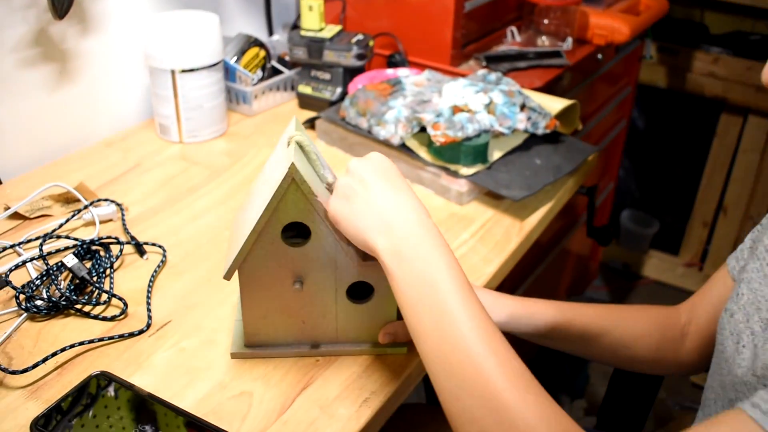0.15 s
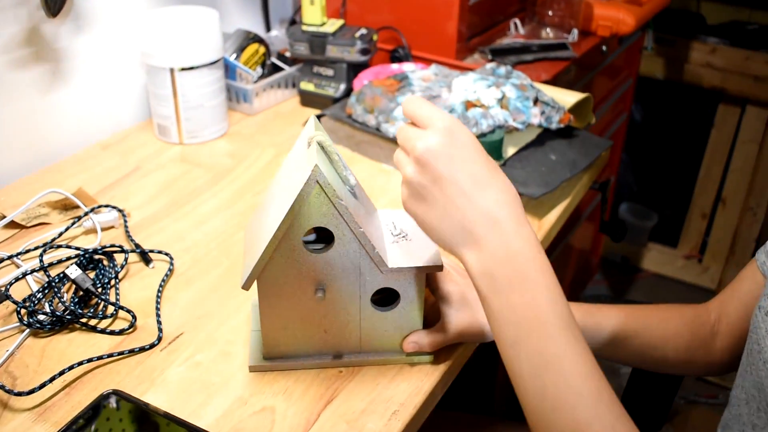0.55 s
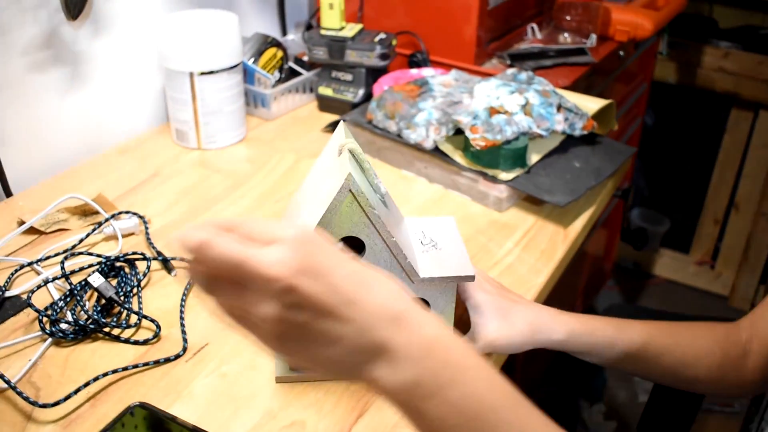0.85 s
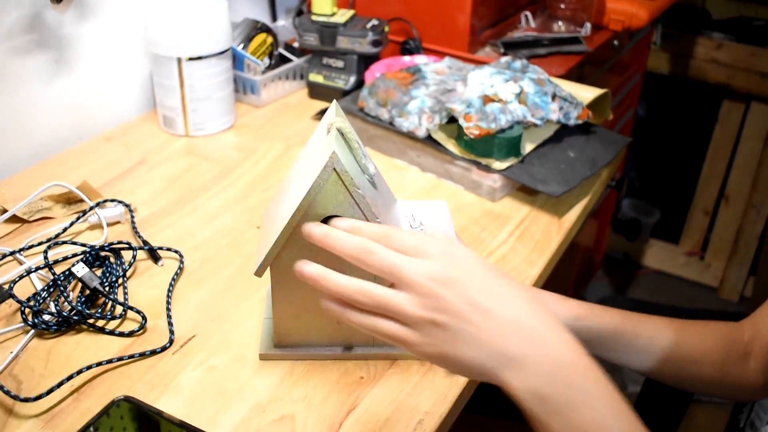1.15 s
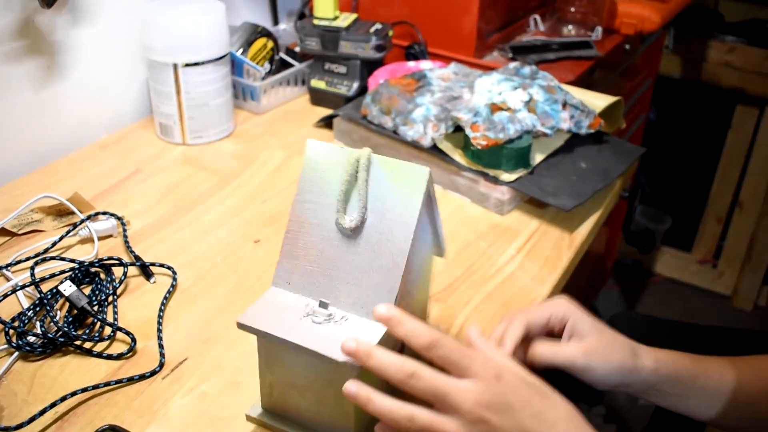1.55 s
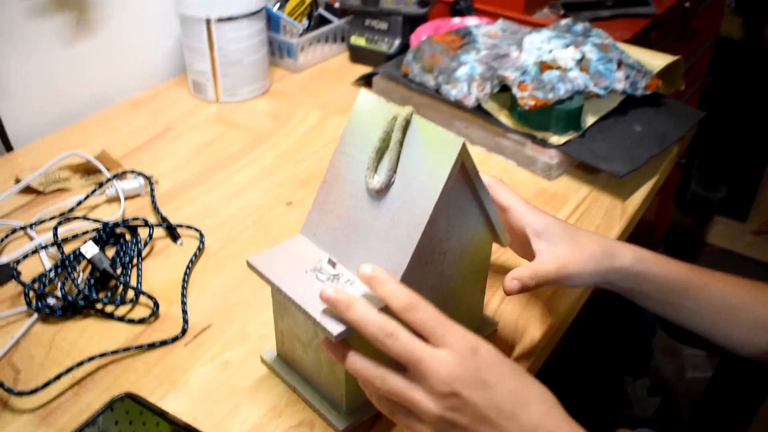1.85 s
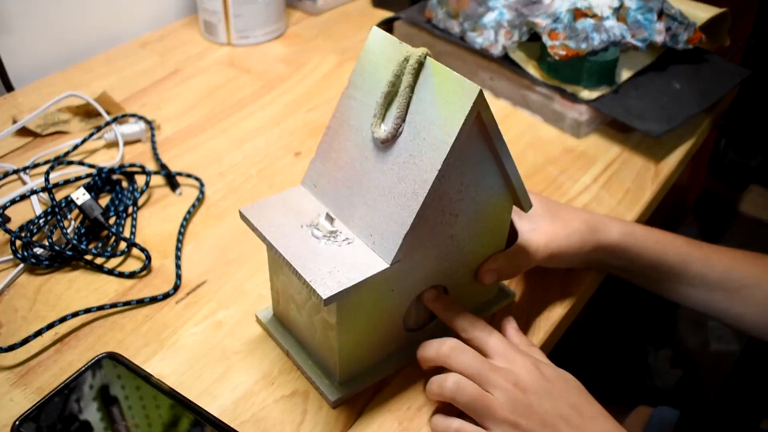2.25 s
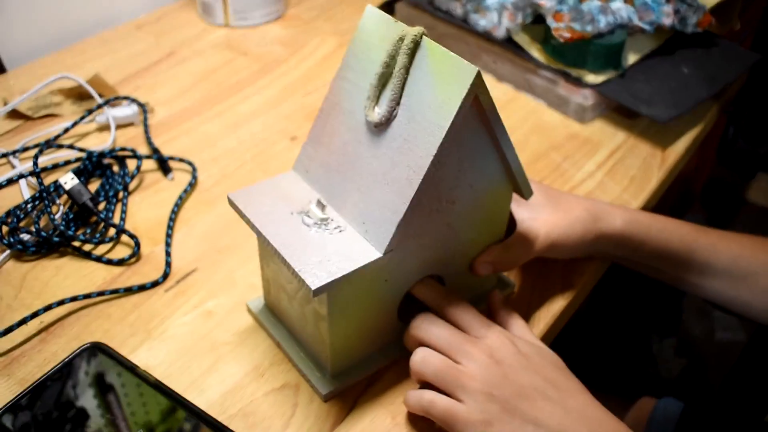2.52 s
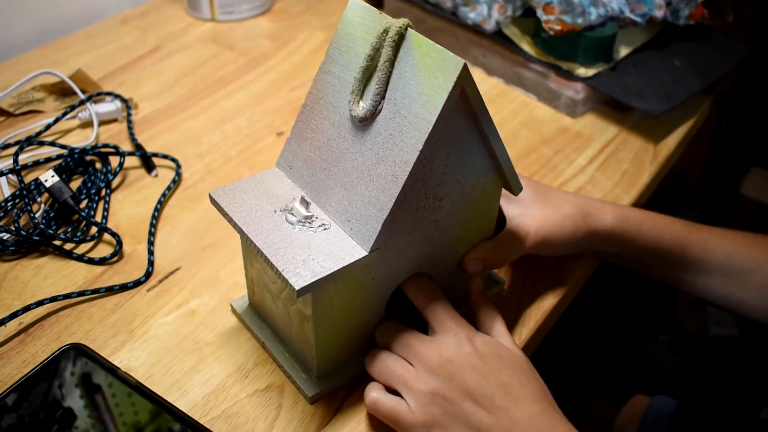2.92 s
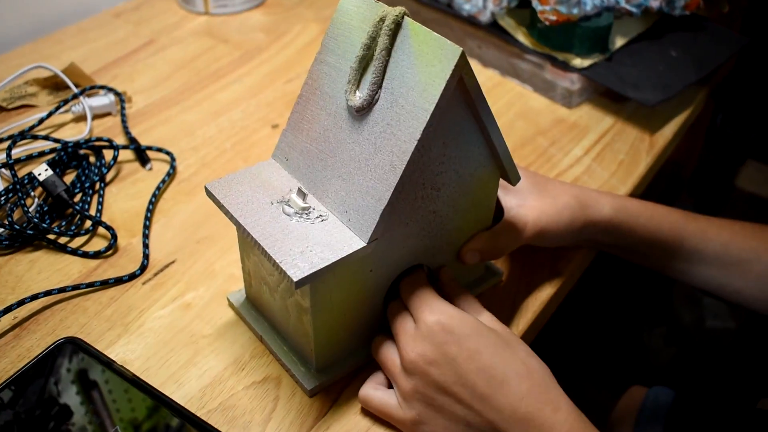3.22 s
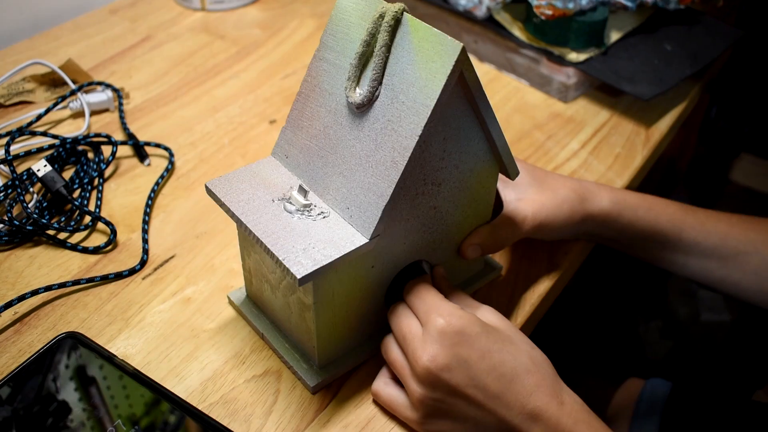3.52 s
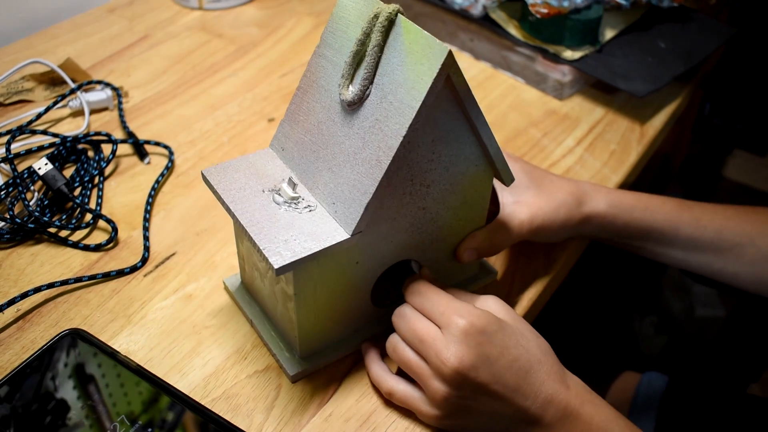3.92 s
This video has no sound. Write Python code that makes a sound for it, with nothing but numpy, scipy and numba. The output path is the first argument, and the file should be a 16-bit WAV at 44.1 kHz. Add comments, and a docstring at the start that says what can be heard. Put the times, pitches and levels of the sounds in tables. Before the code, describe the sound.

Tape rasps off a hollow wooden box, which judders across a bench with a scraping rattle, then fingers rub and tick at its hole.

```python
"""In a small workshop, hands peel masking tape off a hollow wooden box, turn it on a bench and pick at its entrance hole.
Stick-slip grains and single clicks ring the walls, base, cavity and roof of the box, the bench top and the tape paper.
The dragged box judders: its landings boom in the bench, grit crunches and a base edge scrapes in a narrow band.
A lifted strip of tape rings at a moving pitch; the room answers with a short tail over quiet, low air."""
import sys
import numpy as np
from scipy import signal
from scipy.fft import rfft, irfft
from scipy.io import wavfile
from scipy.ndimage import uniform_filter1d
from numba import njit

SR = 44100
rng = np.random.default_rng(int(sys.argv[2]) if len(sys.argv) > 2 else 0)


def output_pcm(signal):
    """Save a mono or channel-first signal as 16-bit PCM at the path in sys.argv[1].

    Samples are clipped to [-1, 1] before scaling.
    """
    pcm = np.clip(np.atleast_2d(signal).T, -1, 1) * 32767
    wavfile.write(sys.argv[1], SR, np.round(pcm).astype(np.int16))


N = 179619


def undb(db):
    """Amplitude factor of a level in dB."""
    return 10 ** (np.asarray(db) / 20)


def unit(x):
    """Scale to rms 1."""
    return x / np.sqrt(np.mean(x ** 2))


def colour(x, points):
    """Filter by a spectrum of (frequency [Hz], level [dB])."""
    hz, db = np.transpose(points)
    f = np.fft.rfftfreq(len(x), 1 / SR)
    gain = undb(np.interp(np.log(f + 1), np.log(hz), db))
    return irfft(rfft(x) * gain, len(x))


def walk(rate):
    """Random levels, rate per second, joined by slopes; rms 1."""
    k = int(SR / rate)
    steps = np.repeat(rng.standard_normal(N // k + 1), k)
    return unit(uniform_filter1d(steps, k)[:N])


def curves(table):
    """Columns of a time table, one value per sample."""
    s, *columns = np.transpose(table)
    return [np.interp(np.arange(N) / SR, s, c) for c in columns]


def strike(out, s, ring, peak_db):
    """Add a ring at time s with the given peak."""
    i = int(s * SR)
    out[i:i + len(ring)] += ring * undb(peak_db) / np.abs(ring).max()


def body(modes, sign=-1, below=0.7):
    """Impulse response of damped modes, alternating in sign or in step, weak outside their range; energy 1."""
    t = np.arange(SR // 10) / SR
    ring = np.zeros(len(t))
    for k, (hz, width_hz, db) in enumerate(modes):
        fade = np.exp(-np.pi * width_hz * t)
        ring += sign ** k * undb(db) * width_hz * fade * np.sin(2 * np.pi * hz * t)
    edges = [below * modes[0][0], 1.3 * modes[-1][0]]
    ring = signal.sosfilt(signal.butter(3, edges, "band", fs=SR, output="sos"), ring)
    return ring / np.sqrt(np.sum(ring ** 2))


# resonances of the box, bench top and tape paper: (frequency [Hz], width [Hz], relative level [dB])
WALL_MODES = [(853, 180, 0), (1084, 59, 7.5), (1232, 83, 4.5), (1500, 220, -1), (1699, 36, 3.5)]
BENCH_MODES = [(134.3, 15, 0), (169, 20.6, -4.5)]
BASE_MODES = [(229.2, 60.5, 1), (311, 235, -2)]
CAVITY_MODES = [(369,50,-12.5),(444,46,1.5),(501,29.5,1),(544.3,34,-2),(617,19,-2),(668.5,61,-6),(828,170,-12)]
ROOF_MODES = [(1863, 266, -2), (2128, 115, 1), (2410, 177, -4), (2556, 68, 1), (2732, 400, -4),
              (3226, 330, -4.5), (3660, 230, -3.5), (3870, 360, -6.5), (4637, 960, -8)]
PAPER_MODES = [(4720, 1100, 2), (6020, 2640, 1), (7410, 4630, -3), (11300, 4600, -10.5), (12950, 1600, -13)]


def rubbed_bodies():
    """Responses of walls, bench, base, cavity, roof and paper to friction, modes alternating in sign."""
    return [body(WALL_MODES), body(BENCH_MODES), body(BASE_MODES),
            body(CAVITY_MODES, below=0.9), body(ROOF_MODES), body(PAPER_MODES)]


def struck_bodies(rubbed):
    """A blow starts the modes of walls, cavity and roof together; bench, base and paper stay as rubbed."""
    _, bench, base, _, _, paper = rubbed
    return [body(WALL_MODES, sign=1), bench, base,
            body(CAVITY_MODES, sign=1, below=1.05), body(ROOF_MODES, sign=1), paper]


def slips(rate, scatter_db, hiss):
    """Adhesive and wood let go in random jerks, rate per second, of uneven size over finer friction."""
    when, size, sign = rng.random(N), rng.exponential(size=N), rng.choice([-1, 1], N)
    jerks = (when < rate / SR) * sign * undb(scatter_db * np.minimum(size, 3))
    return unit(unit(jerks) + hiss * rng.standard_normal(N))


def shared(db, shares, low_db, cavity_db, high_db):
    """Power in each of the six bodies: common level, fixed share and the colour of the moment."""
    extra = (0, low_db, low_db, cavity_db, high_db, high_db)
    return np.array([undb(db + a + b) ** 2 for a, b in zip(shares, extra)])


def strokes(table, shares):
    """Power of strokes that each swell, hold and fade along straight lines in dB."""
    t, power = np.arange(N) / SR, 0
    for s, swell, hold, fade, db, *colour_db in table:
        # swells and fades set shorter than 5 ms play as 5 ms
        away = np.maximum((s - t) / max(swell, .005), (t - s - hold) / max(fade, .005))
        power = power + shared(db - 20 * np.maximum(away, 0), shares, *colour_db)
    return power


# tape comes off the wall: (start of hold [s], swell over 20 dB [s], hold [s], fade over 20 dB [s], level [dB],
# bench and base above share [dB], cavity above share [dB], roof and paper above share [dB])
PEEL_STROKES = [(.32, 0.22, 0.24, 0.05, -53.5, 5.5, 3, 1), (.7, 0.14, 0.049, .05, -46.5, -4, -6, -6.5),
                (.775, 0.032, 0.012, 0.016, -37, -3.5, -9, -7.5), (.87, 0.12, 0.14, 0.07, -49, -1, 2.5, -2),
                (1.11, 0.016, 0.046, 0.034, -54, -1, -12, 6)]
# shares of a peel: (walls [dB], bench [dB], base [dB], cavity [dB], roof [dB], paper [dB])
PEEL_BODY_SHARES = (-1, -37, -14.5, -6, -2.5, -13)


def peels():
    """Power that tape tearing off the wall puts into each body."""
    return strokes(PEEL_STROKES, PEEL_BODY_SHARES)


# a finger rubs the hole: (start of hold [s], swell over 20 dB [s], hold [s], fade over 20 dB [s], level [dB],
# bench and base above share [dB], cavity above share [dB], roof and paper above share [dB])
PICK_STROKES = [(2.68, 0.068, 0.14, 0.058, -40, 3.5, -1.5, 3.5),
                (2.9, 0.064, 0.031, 0.035, -42.5, 6, -13.5, 6),
                (2.965, 0.034, 0.05, 0.04, -47.5, 4.5, -3.5, 9.5),
                (3.092, 0.05, 0.019, 0.016, -50.5, 5, 0.5, 4),
                (3.24, 0.044, 0.0088, 0.28, -52, 23.5, -1, -1),
                (3.368, 0.047, 0.022, 0.091, -40, -8.5, 2, -2), (3.4, 0.057, 0.013, 0.032, -30, -18, -6, 7)]
# shares of a pick: (walls [dB], bench [dB], base [dB], cavity [dB], roof [dB], paper [dB])
PICK_BODY_SHARES = (-9.5, -31, -55, 2, -15.5, -31.5)


def picks():
    """Power that a finger rubbing the entrance hole puts into each body."""
    return strokes(PICK_STROKES, PICK_BODY_SHARES)


# the box slides on the bench: (start of hold [s], swell over 20 dB [s], hold [s], fade over 20 dB [s], level [dB],
# bench and base above share [dB], cavity above share [dB], roof and paper above share [dB])
DRAG_STROKES = [(0, 1.2, 0.028, -0.45, -50, 6.5, 2, -7), (.25, -0.7, 0.03, 0, -49, -3, -23, -2.5),
                (.885, 0.2, 0.013, -3, -54, -5, -5, -20), (.93, 0.1, 0.025, .05, -40, -4.5, -6, -8),
                (.965, .04, 0.024, -0.24, -41.5, 1, -7, 0), (1.003, 0, 0.0067, -0.15, -43, 3, -1, -5),
                (1.85, 0.09, 0.0052, 0.05, -44, 0, 1.5, -5),
                (1.303, -0.01, 0.0051, 0.1, -39.5, -10, -13, -0.5),
                (2.076, 0, 0.0063, 0.01, -48.5, -9, -4, -1), (2.15, .05, 0.018, 0.08, -51, -1, 0.5, -3),
                (2.351, .006, 0.0058, -0.05, -46, 1, 1.5, -7),
                (2.379, 0.04, 0.0073, -0.12, -47.5, -6, 5, -8.5), (2.53, 0.05, 0.006, 0, -50, -15, -2, -10),
                (2.597, 0.1, .008, -0.1, -52, -14, -12, -11), (2.36, 0, 0.0099, 0.4, -55, -11, 2, -8.5),
                (3.72, 0.76, 0.022, 0.1, -55, -1, 2, -3), (3.93, 0.37, 0.067, -1.6, -54.5, -7, -0.5, -4)]
# shares of a drag: (walls [dB], bench [dB], base [dB], cavity [dB], roof [dB], paper [dB])
DRAG_BODY_SHARES = (-2.5, -7, -3.5, -0.5, -1, -15)


def drags():
    """Power that short slides of the box on the bench put into each body."""
    return strokes(DRAG_STROKES, DRAG_BODY_SHARES)


# the box turns on the bench in one long drag: (time [s], level [dB], bench and base above share [dB],
# cavity above share [dB], roof and paper above share [dB])
TURN_CURVE = [(1.19, -54, -11, -8, -2), (1.235, -40, 0.5, -10, -4), (1.3, -39, -3.5, -6, -2),
              (1.38, -39, -6.5, -25, -3), (1.43, -39, -2.5, 3.5, 6), (1.49, -39, 6, 6, 2),
              (1.54, -37.5, 2.5, 8, 5.5), (1.58, -40, 6.5, 1.5, 0), (1.62, -42, -7, -3, 2.5),
              (1.72, -49, 0.5, 5, -2.5), (1.78, -78, 1, -5, 8)]


def turn():
    """Power that the long drag puts into each body, silent outside its times."""
    db, *colour_db = curves(TURN_CURVE)
    t = np.arange(N) / SR
    inside = (t > TURN_CURVE[0][0]) * (t < TURN_CURVE[-1][0])
    return shared(db, DRAG_BODY_SHARES, *colour_db) * inside


# hands shift on the box throughout: (time [s], level [dB], bench and base above share [dB],
# cavity above share [dB], roof and paper above share [dB])
HOLD_CURVE = [(0,-48,7,4,0.5),(.32,-62,-7,3,2),(.89,-52.5,-0.5,0,3.5),(1.06,-54,6,3,2.5),(1.27,-49,-2,2,-1),(1.4,-40.5,-4,-1.5,6),(1.51,-49,0,2,2),
              (1.68,-56,7,-7,2),(2.02,-61.5,4,0,3.5),(2.66,-62,5.5,-2,1.5),(2.86,-57,0,10.5,-6),(3.04,-56,-0.5,1,0.5),(3.24,-54.5,-9,-3,1.5),(3.66,-58,0,-11,1.5),
              (3.79,-57,-3.5,-7,-1.5),(4.07,-60.5,1,0,4.5)]
# shares of the holding hands: (walls [dB], bench [dB], base [dB], cavity [dB], roof [dB], paper [dB])
HOLD_BODY_SHARES = (-5.5, -12.5, -8, -6.5, -6.5, -14.5)


def holding():
    """Power that the holding hands put into each body without pause."""
    db, *colour_db = curves(HOLD_CURVE)
    return shared(db, HOLD_BODY_SHARES, *colour_db)


# the dragged box hops: (time of landing [s], depth of the pulsing [0-1], bench boom [dB],
# crunch level [dB, its rms is 6 dB lower], crunch pitch [Hz])
HOP_LANDINGS = [(1.375,0.2,-56,-42,3230),(1.393,0.15,-53,-43,3200),(1.41,0,-38.5,-41,3100),(1.433,0.3,-37,-41,3100),(1.458,0.2,-32.5,-38,2050),
                (1.48,0.17,-32.5,-36,3760),(1.501,0.3,-29,-36,1820),(1.524,0.27,-33.5,-40,2740),(1.546,0.3,-33.5,-36.5,1960),(1.566,0.5,-35,-43.5,3330),
                (1.585,0.4,-35.5,-38,1980),(1.606,0,-48,-46,2680),(1.63,0.2,-67,-44.5,3330)]
CRUNCH_S, CRUNCH_CYCLES = .0022, 9.0  # peak of a grit burst; cycles in which its ring fades by 20 dB


def hop_phase():
    """Count of hops so far, rising by one from each landing to the next."""
    return np.interp(np.arange(N) / SR, np.transpose(HOP_LANDINGS)[0], np.arange(len(HOP_LANDINGS)))


def judder():
    """Pulsing of the friction, one swell per hop; returns its depth and its gain."""
    phase = hop_phase()
    inside = (phase > 0) * (phase < len(HOP_LANDINGS) - 1)
    depth = np.clip(curves(HOP_LANDINGS)[0], 0, 1) * inside
    pulse = 2.2 * np.sin(np.pi * (phase % 1) ** .42) ** 4
    return depth, 1 - depth + depth * pulse


def landings():
    """Every landing after the first row is an impulse that booms in the bench top."""
    boom_db = curves(HOP_LANDINGS)[1]
    mean_gap_s = np.diff(np.transpose(HOP_LANDINGS)[0]).mean()
    impulses = np.diff(np.floor(hop_phase()), prepend=0) * np.sqrt(SR * mean_gap_s)
    return signal.fftconvolve(impulses * undb(boom_db), body(BENCH_MODES, below=0.79))[:N]


def crunches():
    """At each row a burst of grit rings the base edge at its own pitch."""
    out, t = np.zeros(N), np.arange(SR // 25) / SR
    grit = rng.standard_normal((len(HOP_LANDINGS), len(t))) ** 3 * t * np.exp(-t / CRUNCH_S)
    for (s, _, _, db, hz), burst in zip(HOP_LANDINGS, grit):
        edge = np.sin(2 * np.pi * hz * t) * 10 ** (-t * hz / CRUNCH_CYCLES)
        ring = signal.fftconvolve(burst, edge)
        i = int(s * SR)
        out[i:i + len(ring)] += undb(db) * unit(ring) / 2
    return out


# edge of the entrance hole: (frequency [Hz], width [Hz], relative level [dB])
RIM_MODES = [(706, 71, -6), (834, 57, -1.5), (952, 66, -1)]
# dry skin hissing on the rim: (frequency [Hz], width [Hz], relative level [dB])
SKIN_MODES = [(8500, 5700, 1), (13400, 2700, 0)]
RIM_DB, SKIN_DB = -9, -7.5  # rim relative to the cavity drive, skin relative to the paper drive
PAPER_FLICKER_DB = 2  # rms


def rubbing(bodies):
    """Hands play slips into each body; hops pulse walls, cavity, roof and paper, and picks add rim and skin."""
    depth, hop = judder()
    grip = undb(1.5 * walk(45))  # finger pressure trembles
    coarse = slips(rate=400, scatter_db=2.5, hiss=0.72)
    fine = slips(rate=1200, scatter_db=0.0, hiss=0.98)
    medium = unit(coarse + fine)
    flicker = undb(PAPER_FLICKER_DB * walk(25.68))
    drives = (medium * grip * hop,  # walls
              coarse * (1 - depth),  # bench
              coarse,  # base
              coarse * grip * hop,  # cavity
              fine * grip ** (1 - depth) * hop,  # roof
              fine * hop * flicker)  # paper
    pick_power = picks()
    gains = np.sqrt(drags() + peels() + pick_power + turn() + holding())
    out = sum(signal.fftconvolve(d * g, b)[:N] for d, g, b in zip(drives, gains, bodies))
    rim_drive = coarse * grip * np.sqrt(pick_power[3]) * undb(RIM_DB)
    skin_drive = fine * np.sqrt(pick_power[5]) * undb(SKIN_DB)
    out += signal.fftconvolve(rim_drive, body(RIM_MODES))[:N]
    return out + signal.fftconvolve(skin_drive, body(SKIN_MODES))[:N]


# single clicks: (time [s], walls peak [dB], cavity above walls [dB], roof above walls [dB], paper above walls [dB],
# snap above walls [dB], pitch of the snapping nail or tape edge [Hz], rattle t60 [s])
CLICK_EVENTS = [(0.133,-50,-36,-5,8.5,-3,1830,0.09),(.232,-60,-13,-5,12,-10,1800,0.083),(.257,-32.5,1.5,-22,-6.5,-1,1510,0.081),
                (.263,-34.5,2.5,-20,-16,-5,1150,0.063),(0.27,-40,2.5,-18,-20,-2,1480,.05),(0.638,-49.5,-17,14,8.5,-10,2300,0.098),(.774,-35.5,-6,0,3,4,2940,0.024),
                (.781,-36,-17,-13,-10,-6,1410,.033),(0.785,-33,-22,-3,-33,5,1118,0.079),(.86,-44.5,6,11,5,6.5,3400,0.032),(.869,-56,1,3,-8,-3,4530,.02),
                (.972,-41,-26,-8,-5,-6,1170,0.056),(1.095,-43.5,-17,5,6,-5,2458,0.13),(1.136,-46,-5.5,6,-6,8,2860,0.03),(1.158,-38.5,0.5,-14,-1.5,-5,1600,0.024),
                (1.242,-26,-11,6,-0.5,2,1641,0.025),(1.351,-23.5,-31,-5,-27,-7,1575,0.053),
                (1.566,-30,9,-5,-20,5,1570,.046),(1.897,-48.5,-22,8.5,-22.5,4.5,1630,0.045),(1.941,-44,-18,11,-5,6,1570,0.012),
                (1.954,-43,-34,-26,-38,-10,1010,.024),(1.997,-39,-20,5,-19,-0.5,1120,0.07),
                (2.256,-35.5,-22.5,11,-11,1.5,1075,0.025),(2.263,-43.5,2.5,-8,-20,-3,1090,0.023),(2.274,-45.5,4.5,-8,-21,3,710,0.047),(2.284,-47,-3,-2,-21,4,2950,.027),
                (2.313,-38,0,-6,-7.5,-6,1900,0.08),(2.3202,-36,-9,-5,-17,2,2900,0.018),(2.372,-41,-2,-12,-16,3,1000,0.04),
                (2.395,-52,-4,-10,-20,-9,810,.05),(2.465,-49.5,-13,-19,-26.5,-2,1520,.027),(2.491,-46,-4,-14,-27,1,780,.03),
                (2.67,-41,12,-28,-48.5,-9,935,0.057),(2.726,-34,7,-6,-7,4,860,0.034),
                (2.742,-39,0,-5,-9,-6,1535,.04),(2.896,-24.5,-8.5,-9,-12,-6.5,1970,0.036),(2.905,-33,-10,5.5,-9,-17,1870,0.041),(2.91,-35,-16,7.5,-4.5,-12,1650,0.12),
                (2.967,-37.5,-2,-15,-8,-1,1020,0.087),(2.98,-29,3,7,1,-7,2010,0.073),(2.992,-36,-2,5,-14,1,1810,0.046),(3.109,-31.5,-10.5,-10,-12,-6.5,1100,0.032),
                (3.114,-36.5,-3.5,0.5,-16,-3,1860,.05),(3.19,-31.5,4.5,-3.5,-9.5,-5,740,0.038),(3.401,-51,-15,6,-28,-8,1540,.019),(3.568,-40,0.5,5,0.5,-1,1376,0.031),
                (3.694,-45,-7,-12,-10,-1.5,1060,0.051),(3.867,-45,3.5,-13,-2.5,-6,2420,0.26)]
CLICK_BENCH_DB, CLICK_BASE_DB = -30.5, -30.5  # above the walls
TICK_DB, TICK_MS = 13, 0.18  # first contact: size over a full rattle, length of the push
SNAP_CYCLES = 11.8  # cycles in which a snap fades by 20 dB
SOFT_T60_S = 0.041  # shorter rattles are also weaker against their tick


def clicks(bodies):
    """A sharp tick with a short rattle behind it rings each body; the edge that let go snaps at its own pitch."""
    out, t = np.zeros(N + SR), np.arange(SR // 8) / SR
    tick = undb(TICK_DB) * np.exp(-(t * 2000 / TICK_MS - 1) ** 2)
    rattles = rng.standard_normal((len(CLICK_EVENTS), len(t))) ** 3 / 4  # cubed into separate crackles
    for (s, db, cavity_db, roof_db, paper_db, snap_db, hz, t60), rattle in zip(CLICK_EVENTS, rattles):
        softness = min(t60 / SOFT_T60_S, 1) ** 2
        blow = tick + rattle * np.exp(-np.log(1000) * t / t60) * softness
        snap = np.sin(2 * np.pi * hz * t) * 10 ** (-t * hz / SNAP_CYCLES)
        parts_db = [0, CLICK_BENCH_DB, CLICK_BASE_DB, cavity_db, roof_db, paper_db, snap_db]
        for part_db, b in zip(parts_db, [*bodies, snap]):
            strike(out, s, signal.fftconvolve(blow, b), db + part_db)
    return out[:N]


# the fingertip catches on the hole and lets go: (time [s], cavity peak [dB], rim above cavity [dB])
CATCH_EVENTS = [(2.693, -27.5, -2), (2.706, -29, 4), (2.716, -33, 6), (2.7405, -24.5, -19),
                (2.751, -22.5, -19), (2.76, -27.5, -18), (2.779, -26, -9), (2.791, -27, -4),
                (2.797, -38, -6), (2.805, -26, -6), (2.829, -31, -5), (2.84, -36, -8), (3.208, -43, -3),
                (3.247, -45, -8), (3.345, -36, -22), (3.364, -32, -18), (3.384, -27.5, -12),
                (3.412, -29, -6), (3.423, -30, 4)]


def catches(bodies):
    """Each release of the fingertip is an impulse into the cavity and the rim."""
    out, rim = np.zeros(N + SR), body(RIM_MODES, sign=1.0)
    for s, db, rim_db in CATCH_EVENTS:
        strike(out, s, bodies[3], db)
        strike(out, s, rim, db + rim_db)
    return out[:N]


# the box knocks on the bench: (time [s], bench peak [dB], base peak [dB])
THUMP_EVENTS = [(0.2561, -36.5, -37.5), (0.971, -60, -31), (1.157, -45, -61)]


def thumps(bodies):
    """Each knock is an impulse into the bench top and the base."""
    out = np.zeros(N + SR)
    for s, bench_db, base_db in THUMP_EVENTS:
        strike(out, s, bodies[1], bench_db)
        strike(out, s, bodies[2], base_db)
    return out[:N]


@njit
def sweep(x, hz, damping):
    """State-variable band-pass whose centre moves, gain 1 at the centre."""
    y, b, l = np.empty(len(x)), 0., 0.
    for i in range(len(x)):
        g = np.tan(np.pi * hz[i] / SR)
        v = (b + g * (x[i] - l)) / (1 + g * (g + damping))
        b, l, y[i] = 2 * v - b, l + 2 * g * v, damping * v
    return y


def moving_ring(table):
    """Slips ring a narrow resonance that moves, silent before the first and after the last row."""
    hz, db = curves(table)
    grains = slips(rate=1200, scatter_db=3.0, hiss=0.75)
    ring = unit(sweep(sweep(grains, hz, 0.15), hz, 1.0))
    inside = (hz != hz[0]) * (hz != hz[-1])
    return ring * undb(db + 1.6 * walk(59.8)) * inside


# the lifted strip grows longer and its ring sinks: (time [s], pitch [Hz], level [dB])
STRIP_RING = [(.63,2310,-62),(.655,2070,-54),(.685,2030,-46),(.705,1820,-50),(.712,1700,-54),(.718,1140,-51),(.727,1110,-42),(.76,1090,-59),(.79,1110,-39),(.815,1070,-70)]


def tape_strip():
    """The free strip of tape rings at its moving pitch under the slips of the glue."""
    return moving_ring(STRIP_RING)


# an edge of the base scrapes while the box turns: (time [s], pitch [Hz], level [dB])
SCRAPE_RING = [(1.24, 2900, -66), (1.33, 3180, -53), (1.41, 3300, -43), (1.46, 3470, -54),
               (1.55, 2880, -45.5), (1.64, 3254, -43), (1.7, 3050, -59.5)]


def base_scrape():
    """Slips of the base edge on the bench ring in a narrow moving band."""
    return moving_ring(SCRAPE_RING)


ROOM_T60_S = 0.11


def room(x):
    """A diffuse tail: noise from 2 ms on that fades exponentially, energy 1."""
    t = np.arange(SR // 3) / SR
    tail = rng.standard_normal(len(t)) * np.exp(-np.log(1000) * t / ROOM_T60_S) * (t > .002)
    return signal.fftconvolve(x, tail / np.sqrt(np.sum(tail ** 2)))[:N]


# spectra of the workshop air in mid and side: (frequency [Hz], relative level [dB per Hz])
AIR_MID_SPECTRUM = [(15, -50), (25, 6), (60, 12.5), (122, 14.5), (289, 7.5), (469, 13), (871, 7.5),
                    (1170, 3.5), (2490, -7), (4500, -60), (11500, -22), (13500, -45), (15500, -68)]
AIR_SIDE_SPECTRUM = [(15, -48), (25, -15), (156, -2), (389, 0.5), (1660, -4), (3340, -8.5), (10100, -24),
                     (13500, -34), (15500, -56)]
AIR_DB, AIR_SIDE_DB = -59.5, -63


def air(points, db):
    """Workshop air: coloured noise whose level wavers a little."""
    return unit(colour(rng.standard_normal(N), points)) * undb(db + 1.5 * walk(5.77))


# width of the reflections: (frequency [Hz], side level before ROOM_SIDE_DB [dB])
ROOM_WIDTH = [(60, -29), (110, -61), (200, -39), (380, -29), (700, -29), (1290, -17), (2380, -13.5),
              (4400, -9.5), (8120, -3), (15000, 0)]
ROOM_DB, ROOM_SIDE_DB = -13, -5


def scene():
    """Close-set microphones hear the same direct sound; they differ in the reflections, most in the treble."""
    rubbed = rubbed_bodies()
    struck = struck_bodies(rubbed)
    hands = rubbing(rubbed) + clicks(struck) + catches(struck) + thumps(struck)
    hands += landings() + crunches() + tape_strip() + base_scrape()
    mid = hands + undb(ROOM_DB) * room(hands) + air(AIR_MID_SPECTRUM, AIR_DB)
    side = undb(ROOM_SIDE_DB) * colour(room(hands), ROOM_WIDTH) + air(AIR_SIDE_SPECTRUM, AIR_SIDE_DB)
    side -= 0.023 * mid  # leans slightly to the right
    return np.array([mid + side, mid - side])


LOW_CUT_HZ, TOP_HZ = 45, 15650


def record(dry):
    """A gentle high-pass thins the deepest bass and a steep low-pass cuts the top."""
    thin = signal.sosfilt(signal.butter(2, LOW_CUT_HZ, "high", fs=SR, output="sos"), dry)
    return signal.sosfilt(signal.ellip(10, .2, 70, TOP_HZ, fs=SR, output="sos"), thin)


dry = scene()
out = record(dry)
output_pcm(out)
```